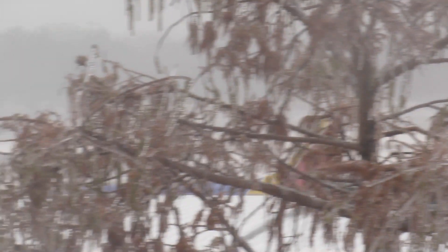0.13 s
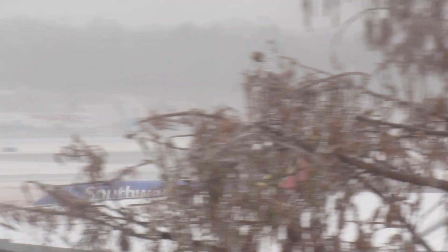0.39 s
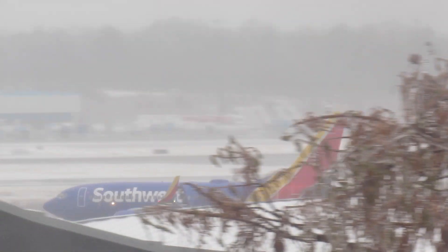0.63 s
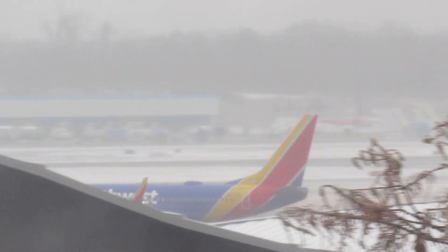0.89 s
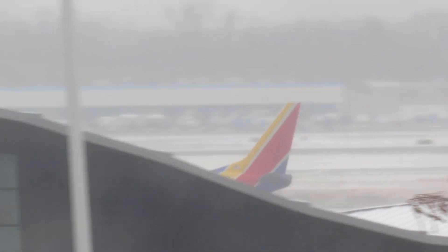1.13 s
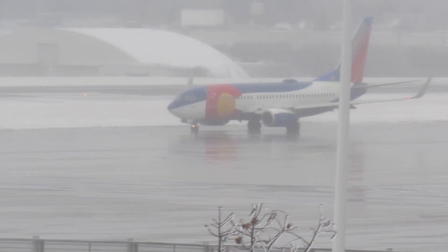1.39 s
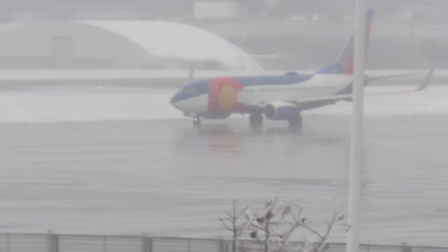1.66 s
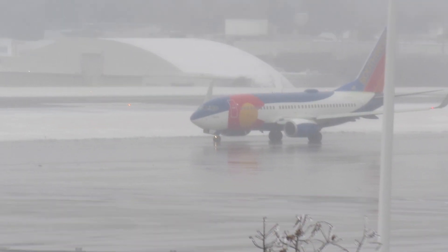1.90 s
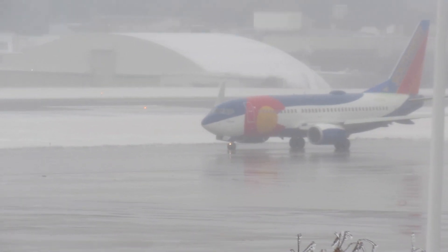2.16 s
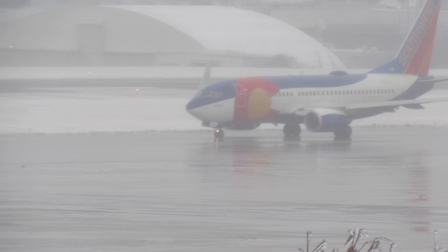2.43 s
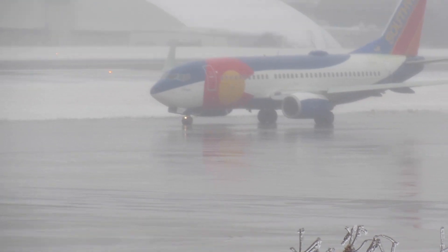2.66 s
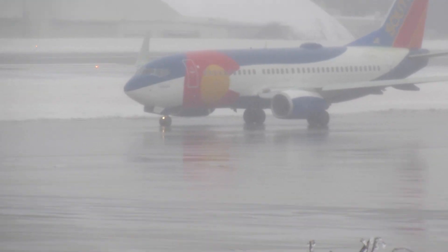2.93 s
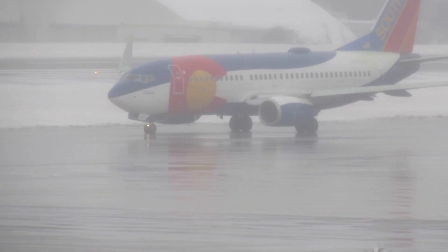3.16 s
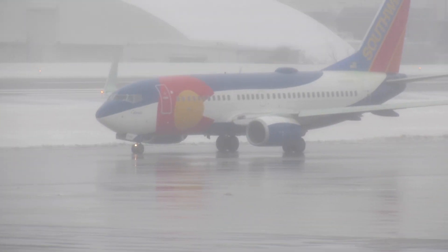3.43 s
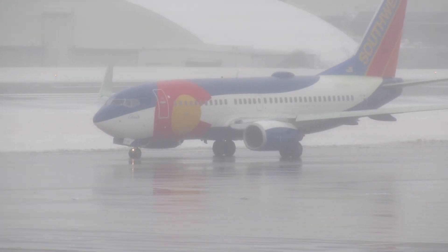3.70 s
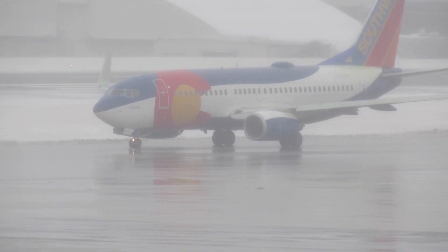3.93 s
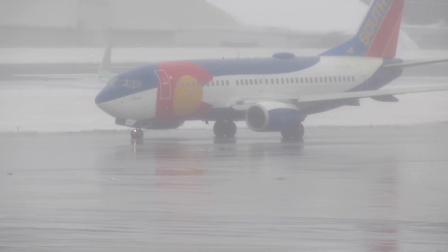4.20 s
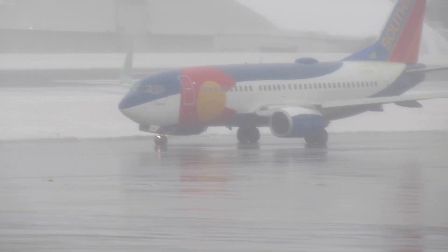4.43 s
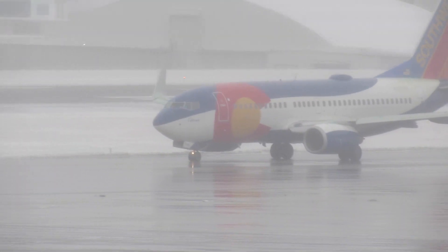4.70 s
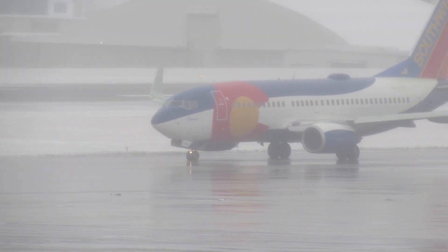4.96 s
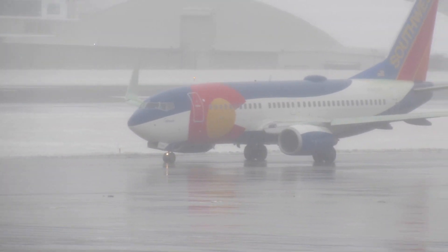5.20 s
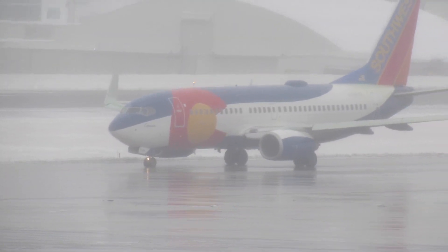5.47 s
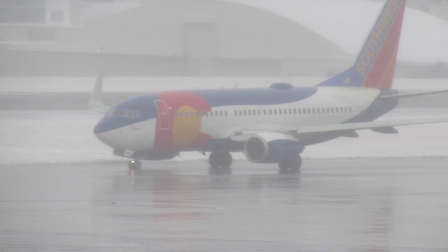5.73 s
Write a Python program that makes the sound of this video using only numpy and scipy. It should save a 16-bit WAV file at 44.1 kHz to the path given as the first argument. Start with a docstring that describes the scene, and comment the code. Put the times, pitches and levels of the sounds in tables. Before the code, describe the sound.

Steady jet engine roar, a short gap of silence, then a duller, softer roar with wind thumping and overloading the microphone.

```python
"""Jet engines across a wet airfield

Distant idling engines: a roar of shaped noise, a fan buzz of steady sinusoidal orders, a few drifting whines.
Two scenes parted by silence; each has its own roar colour. In the second, noise gusts and single thumps push
the two microphone ports against each other, overload them and pull an automatic gain down.
Small ticks of band noise, faint hiss and one brief dip in level complete it."""
import sys
import numpy as np
from scipy import signal
from scipy.fft import rfft, irfft
from scipy.io import wavfile
from scipy.ndimage import uniform_filter1d

SR = 44100
rng = np.random.default_rng(int(sys.argv[2]) if len(sys.argv) > 2 else 0)


def gain_from_db(level_db):
    """Turn a decibel level (scalar or array-like) into a linear amplitude factor."""
    decades = np.asarray(level_db, float) / 20
    return 10 ** decades


def dump(signal):
    """Clip the signal to [-1, 1] and save it as 16-bit WAV at the path in sys.argv[1]."""
    limited = np.clip(np.atleast_2d(signal).T, -1, 1)
    pcm = np.round(limited * 32767).astype(np.int16)
    wavfile.write(sys.argv[1], SR, pcm)


N = 257676

# roar level, and its treble against it, low while something shades the engines: start_s, level_db, treble_db
ROAR_CURVE = [(0, -33.5, -8.5), (1.33, -35.5, -10), (1.51, -39, -7.5), (2.0, -39.3, -8),
              (2.08, -38.5, -19.5), (2.8, -40, -19.5), (3.15, -40.5, -20), (3.35, -39, -19.5),
              (3.9, -39.5, -15), (4.75, -38.5, -10), (5.05, -39, -8.5), (5.3, -39.5, -9.5),
              (5.6, -37.5, -8.5), (5.84, -37.5, -10)]
# share of the treble shade felt at each frequency: freq_hz, share
TREBLE_REACH = [(1300, 0.0075), (1680, 0.52), (1900, 1.3), (2600, 0.88), (3500, 0.84), (6000, 0.69),
                (10000, 0.057)]
SILENCE_START_S, SILENCE_END_S = 1.3425, 1.4995  # between the scenes
OPEN_TREBLE_DB = (-7, -10.5)  # treble at which each scene has its plain colour
BREEZE_DB = -38.5  # wind between gusts


def evened(x):
    """Scales to rms 1."""
    return x / np.sqrt(np.mean(x ** 2) + 1e-20)


def read(points, hz):
    """Interpolates a spectrum table on a log-frequency axis."""
    f, value = np.transpose(points)
    return np.interp(np.log(hz + 1), np.log(f + 1), value)


def follow(rows, t):
    """Interpolates every column of a curve at the times t."""
    s, *columns = np.transpose(rows)
    return [np.interp(t, s, column) for column in columns]


def drift(t, fastest_hz):
    """Slow random wander of rms 1: sines from 0.3 Hz up, weaker as they quicken."""
    rates_hz = np.geomspace(.3, fastest_hz, num=20)
    return evened(sum(np.sin(2 * np.pi * (f * t + rng.random())) / np.sqrt(f) for f in rates_hz))


def slow_drift(t, fastest_hz):
    """Drift computed every 256 samples, then interpolated."""
    return np.interp(t, t[::256], drift(t[::256], fastest_hz))


def between(t, start, end, fade):
    """1 from start to end, with straight fades outside."""
    return np.clip(np.minimum(t - start, end - t) / fade + 1, 0, 1)


def hiss(level_db=-62):
    """Steady microphone noise, unrelated in the two ports."""
    # hiss spectrum: freq_hz, relative_db_per_hz
    hiss_colour = [(2500, -20), (5000, -8), (9500, 1), (12000, -8), (14500, -11.5)]
    shape = gain_from_db(read(hiss_colour, np.fft.rfftfreq(N, 1 / SR)))
    return gain_from_db(level_db) * evened(irfft(rfft(rng.standard_normal((2, N))) * shape, N))


def ticks(t):
    """Small ticks on the camera body: exponentially dying puffs of band noise."""
    # ticks: start_s, level_db, centre_hz, width_hz, t60_s
    tick_rows = [(.925, -35.5, 4800, 2400, 0.012), (5.2455, -20, 500, 590, 0.028),
                 (2.6207, -24.5, 11050, 5500, 0.0028), (2.6221, -32.5, 8600, 5000, 0.0039)]
    out, hz = np.zeros((2, N)), np.fft.rfftfreq(N, 1 / SR)
    for s, db, centre_hz, width_hz, t60_s in tick_rows:
        band = np.exp(-(2 * (hz - centre_hz) / width_hz) ** 2)
        puff = evened(irfft(rfft(rng.standard_normal((2, N))) * band, N))
        decay_db = 60 * np.maximum(t - s, 0) / t60_s
        out += gain_from_db(db - decay_db) * (t > s) * puff
    return out


def gusts(t, lull_db=-10):
    """Wind strength in dB: a breeze with lulls, and gusts that rise fast, hold and fall away."""
    # gusts on the microphone: start_s, peak_db, hold_s
    gust_rows = [(1.523, -29, .04), (1.637, -30.5, 0.016), (1.735, -24, .03), (1.804, -22, .04),
                 (1.858, -16.5, 0.03), (2.096, -30.5, .04), (1.99, -33, .03), (2.168, -32, 0.035),
                 (2.256, -31, .03), (2.353, -36, .05), (2.518, -32, .05), (2.603, -24.5, .02),
                 (2.785, -8, 0.0092), (2.886, -12, 0.038), (3.021, -13.5, 0.025), (3.09, -15.5, .01),
                 (3.183, -25, .01), (3.273, -31, .01), (3.476, -14.5, 0.017), (3.607, -21.5, .05),
                 (3.705, -24.5, 0.086), (3.838, -31, .05), (4.13, -26.5, .04), (4.286, -21, 0.11),
                 (4.429, -28, .03), (4.491, -18, 0.016), (5.022, -22.5, 0.022), (5.067, -11, .02),
                 (5.223, -3, 0.033), (5.284, -0.5, 0.011), (5.33, -9, 0.062), (5.104, -20, .02),
                 (5.42, -17.5, 0.074), (5.506, -17, 0.058), (5.64, -14, 0.025), (5.746, -30, .02)]
    # still moments: start_s, end_s
    lulls = [(3.93, 4.08), (4.62, 4.9)]
    rise_db_per_s, fall_db_per_s = 800, 500
    db = BREEZE_DB + lull_db * sum(between(t, *lull, 0.042) for lull in lulls)
    for s, peak_db, hold_s in gust_rows:
        down_db = np.maximum(rise_db_per_s * (s - t), fall_db_per_s * (t - s - hold_s))
        db = np.maximum(db, peak_db - np.maximum(down_db, 0))
    return db - 40 * (t < SILENCE_END_S)  # the first scene is sheltered


def eddies(gust_db, pitch_hz):
    """Lumpy low noise gathered around the pitch at which eddies are shed."""
    frames, hz = N // 128 + 9, np.fft.rfftfreq(1024, 1 / SR)[:, None]
    ratio = hz / np.interp(np.arange(frames) * 128, np.arange(N), pitch_hz)
    shape = (ratio + .05) ** 1.01 / (1 + (ratio / 1.04) ** 5)
    shape /= np.linalg.norm(shape, axis=0)
    a, b = rng.standard_normal((frames, len(hz), 2)).T
    x = evened(signal.istft((a + 1j * b) * shape, nperseg=1024, noverlap=896)[1][:N])
    swing = np.sqrt(uniform_filter1d(x ** 2, 500) + .05)
    return evened(x / swing ** .7) * gain_from_db(gust_db)  # the flapping keeps a fairly even swing


def wind(t, common_db=-16, lumpy_db=3.5):
    """The ports feel opposite pressure, plus a weaker part in common; a low cut follows the capsules."""
    # hardest buffets: centre_s, peak_db, pitch_hz, push (1 left, -1 right), left_over_right_db
    buffets = [(2.7868, -4, 170, 1, -3), (2.7985, -7.5, 120, 1, 1.5), (5.0660, -2, 85, -1, -7),
               (5.0728, 3, 110, 1, 1), (5.2484, 6.5, 150, 1, -2), (5.291, 1, 130, -1, 0),
               (5.383, 1.5, 165, -1, 4)]
    calm_pitch_hz, pitch_hz_per_db = 70.4, 1.9
    lumps = evened(uniform_filter1d(uniform_filter1d(rng.standard_normal(N), 700), 700))
    gust_db = gusts(t)
    pitch_hz = calm_pitch_hz + pitch_hz_per_db * np.maximum(gust_db - BREEZE_DB, 0)
    gust_db += lumpy_db * np.minimum(lumps, .5)  # eddies come in bursts
    opposed = np.outer([1, -1], eddies(gust_db, pitch_hz))
    out = opposed + gain_from_db(common_db) * eddies(gust_db, pitch_hz)
    for s, _, hz, *_ in buffets:
        out *= 1 - .85 * np.exp(-((t - s) * hz / .75) ** 2)  # one large eddy sweeps the small ones aside
    for s, db, hz, push, lean_db in buffets:
        cycles = (t - s) * hz
        thump = np.cos(2 * np.pi * cycles) * np.exp(-(cycles / 0.42) ** 2)
        port_gain = push * np.array([1, -1]) * gain_from_db([db + lean_db / 2, db - lean_db / 2])
        out += np.outer(port_gain, thump)
    return signal.lfilter(*signal.butter(2, 38, "high", fs=SR), out)


def whine(t, start, end, start_hz, end_hz, db, waver_hz=1.47, shimmer_db=1.0):
    """A lone compressor tone that glides, wavers and fades in and out."""
    hz = np.interp(t, (start, end), (start_hz, end_hz)) + waver_hz * slow_drift(t, 11.46)
    level = between(t, start, end, 0.071) * gain_from_db(db + shimmer_db * slow_drift(t, 11.46))
    return np.sqrt(2) * level * np.cos(2 * np.pi * np.cumsum(hz) / SR)


def whines(t):
    """All the lone compressor tones, each a sinusoid of its own pitch."""
    # whines: start_s, end_s, start_hz, end_hz, level_db
    whine_rows = [(0.203, 0.69, 562, 553, -38.5), (0.846, 1.3, 557.7, 548, -42),
                  (.82, 1.074, 615.4, 615, -40.5), (1.2, 1.332, 613, 613, -44),
                  (3.733, 4.006, 1432, 1430, -48), (4.617, 4.8, 1257, 1278, -47),
                  (4.92, 5.018, 1240, 1250, -53)]
    return sum(whine(t, *row) for row in whine_rows)


def buzz(t, shimmer_db=-0.25):
    """Steady sinusoidal shaft orders, dimmed with the roar's treble outside their beam, firm while it passes."""
    # fan orders: order, steady_db, beam_db (while the beam sweeps the camera), beam_start_s, beam_end_s
    orders = [(1, -45, -39.5, 2.75, 4.4), (2, -65.5, -53.5, 2.6, 3.95), (3, -58.5, -52, 2.9, 3.8),
              (4, -53, -41.5, 2.77, 4.05), (5, -59, -53, 3.35, 4.4), (6, -69, -63, 3.35, 4.15),
              (7, -65.5, -58, 3.3, 4.7), (8, -77.5, -63, 3.76, 4.15), (9, -71, -67, 3.6, 4.1),
              (10, -75, -61, 3.68, 4.08), (11, -85, -73, 3.7, 4.3), (12, -83.5, -72, 3.65, 3.7)]
    shaft_hz, beam_fade_s = 335.85, 0.049
    first_scene_db, wander_db = 6, 2  # both outside the beam only
    facing_s, off_axis_db_per_s = 3.93, 4.5  # beams peak as the intake faces the camera
    tone_shade = .4  # share of the shade on all orders
    ripple_hz, crest_s, ripple_depth = 14.4, 3.826, .65  # the level of the tenth order ripples
    shade_db = OPEN_TREBLE_DB[1] - follow(ROAR_CURVE, t)[1]
    out = np.zeros(N)
    for order, steady_db, beam_db, start, end in orders:
        hz = order * shaft_hz
        shimmer = slow_drift(t, 15)
        shaded_db = (tone_shade + read(TREBLE_REACH, hz)) * shade_db
        steady = gain_from_db(steady_db + first_scene_db * (t < SILENCE_END_S) + wander_db * shimmer - shaded_db)
        facing = gain_from_db(beam_db - off_axis_db_per_s * abs(t - facing_s) + shimmer_db * shimmer)
        beam = between(t, start, end, beam_fade_s)
        level = (1 - beam) * steady + beam * facing
        ripple = 1 + (order == 10) * ripple_depth * np.cos(2 * np.pi * ripple_hz * (t - crest_s))
        out += ripple * level * np.cos(2 * np.pi * (hz * t + rng.random()))
    return np.sqrt(2) * out


def roar(patchy_db=1.0, flicker_db=0.69):
    """Jet noise; the air and buildings on the way shade its treble as the aircraft rolls."""
    # roar colour in each scene: freq_hz, relative_db_per_hz
    first_colour = [(15, -48.5), (25, -23), (114, -3), (166, -3), (222, -5), (340, -6.5), (443, -17),
                    (563, -10.5), (627, -19), (679, -22), (886, -16.5), (1680, -18), (4380, -38),
                    (10500, -44.5), (14500, -55.5)]
    second_colour = [(15, -34), (25, -12), (47, -5.5), (153, 0), (179, 3), (205, -7), (228, 4), (331, 0),
                     (378, -6.5), (579, -12), (679, -14), (1390, -13), (3180, -32), (12000, -49.5),
                     (14500, -65)]
    # ground reflection and camera body colour the roar: centre_hz, half_width_hz, gain_db
    colour_bumps = [(582, 33, 2), (685, 45.4, -11), (860, 72, 1.5), (2620, 170, 2), (5250, 290, 2),
                    (6510, 250, 3), (9800, 350, 0.5)]
    # share of the body and rumble changes felt at each frequency: freq_hz, share
    body_reach = [(170, .05), (230, 0.74), (400, 0.63), (650, 0.038)]
    rumble_reach = [(170, 1), (230, 0.0604)]
    # left-right likeness in each scene: freq_hz, likeness (-1 to 1)
    first_likeness = [(60, 0.96), (99, 0.92), (160, 0.99), (270, 0.97), (440, 0.89), (720, 0.93),
                      (1190, 0.87), (1950, 1), (3210, 0.99), (5280, 0.68), (8680, -0.35), (14300, -0.77)]
    second_likeness = [(60, 1), (99, 0.86), (160, 0.98), (270, 0.96), (440, 0.82), (720, 0.92),
                       (1190, 0.84), (1950, 0.99), (3210, 0.99), (5280, 0.9), (8680, 0.56), (14300, 0.02)]
    # low end, one row a scene: body_db, rumble_db
    scene_lows_db = [(0, 1.9), (-2.5, 2.7)]
    # the low end shifts its weight: centre_s, half_length_s, body_db, rumble_db
    surges = [(0.252, 0.43, -1, 4.5), (0.803, 0.2, 2.5, -4), (1.753, 0.34, 0, 0), (2.4, 0.26, -1, -1),
              (3.59, 0.15, 1.5, -0.5), (4.594, .3, -1.5, -2), (5.25, 0.13, -1, -1), (5.75, .2, 1.5, -1.5)]
    lows_per_shade = [0.18, 0.13]  # body, rumble: dB gained per dB of treble shaded

    frames, hz = N // 256 + 5, np.fft.rfftfreq(1024, 1 / SR)
    t = np.arange(frames) * 256 / SR
    second = (t > (SILENCE_START_S + SILENCE_END_S) / 2).astype(int)
    level_db, treble_db = follow(ROAR_CURVE, t)
    bumps_db = sum(db * np.exp(-((hz - centre) / width) ** 2) for centre, width, db in colour_bumps)
    colour_db = np.array([read(first_colour, hz), read(second_colour, hz)]) + bumps_db
    band = (hz > 750) & (hz < 1700)  # both colours get the same power here
    colour_db -= 10 * np.log10((gain_from_db(colour_db[:, band]) ** 2).sum(1, keepdims=True))

    shade_db = np.array(OPEN_TREBLE_DB)[second] - treble_db
    lows_db = np.array(scene_lows_db)[second].T + np.outer(lows_per_shade, shade_db)
    lows_db += sum(np.outer(db, np.exp(-((t - s) / half) ** 2)) for s, half, *db in surges)
    reach = np.transpose([read(points, hz) for points in (TREBLE_REACH, body_reach, rumble_reach)])
    db = colour_db[second].T + level_db + reach @ [-shade_db, *lows_db]

    a, b, c, d, patches = rng.standard_normal((frames, len(hz), 5)).T
    patches = evened(uniform_filter1d(uniform_filter1d(patches, 10, 0), 12, 1))
    db += patchy_db * patches + flicker_db * drift(t, 30)
    likeness = np.array([read(first_likeness, hz), read(second_likeness, hz)])[second].T
    likeness = np.clip(likeness, -.999, .999)
    mid = (a + 1j * b) * np.sqrt(1 + likeness)  # likeness splits the power
    side = (c + 1j * d) * np.sqrt(1 - likeness)
    z = np.array([mid + side, mid - side]) * gain_from_db(db - 2)
    return signal.istft(z, nperseg=1024, noverlap=768)[1][:, :N]


def scene():
    """Sums hiss, ticks, wind, tones and roar; the tones lean left."""
    t = np.arange(N) / SR
    tones = buzz(t) + whines(t)
    lean_db = np.where(t < SILENCE_END_S, 2, 1.5) / 2  # half of left over right
    return roar() + tones * gain_from_db([lean_db, -lean_db]) + wind(t) + ticks(t) + hiss()


def top_cut(x):
    """Nothing passes above the cut-off."""
    return signal.sosfilt(signal.butter(12, 14880, fs=SR, output="sos"), x)


def record(dry):
    """Gain control after loud gusts, clipping, a brief level dip and the silence between scenes."""
    threshold_db, recovery_db_per_s, gain_share, lag_s = -10.5, 12, 0.76, 0.015
    dip_start_s, dip_end_s, dip_db = 1.914, 1.9845, -17.5
    t = np.arange(N) / SR
    power = uniform_filter1d((dry ** 2).mean(0), 500, origin=249)  # over the last 500 samples
    power_db = 10 * np.log10(abs(power) + 1e-12)
    recovery_db = recovery_db_per_s * t
    held_db = np.maximum.accumulate(power_db + recovery_db) - recovery_db
    over_db = np.maximum(held_db - threshold_db, 0)
    lag = np.exp(-1 / (lag_s * SR))
    cut_db = signal.lfilter([1 - lag], [1, -lag], gain_share * over_db)
    x = np.clip(dry / gain_from_db(cut_db), -.99, .99)
    dip = uniform_filter1d(1. * (t > dip_start_s) * (t < dip_end_s), 40)
    x *= gain_from_db(dip_db * dip)
    outside_s = np.maximum(SILENCE_START_S - t, 4 * (t - SILENCE_END_S))  # fades in 4 times as fast as out
    x *= np.clip(outside_s / 0.0065 + .5, 0, 1)
    return top_cut(x)


dry = scene()
out = record(dry)
dump(out)
```